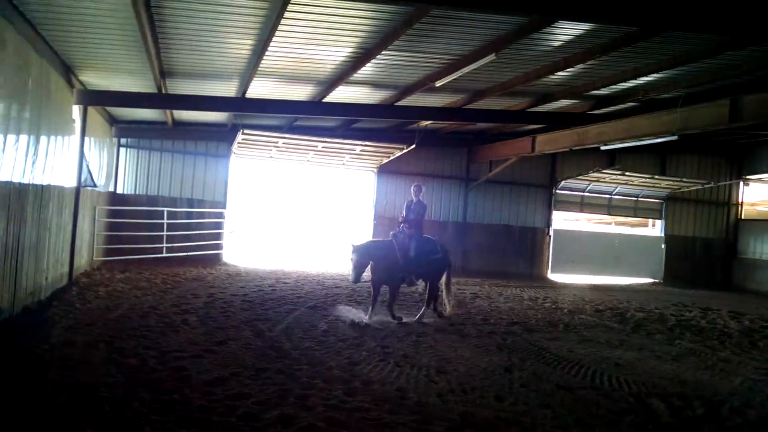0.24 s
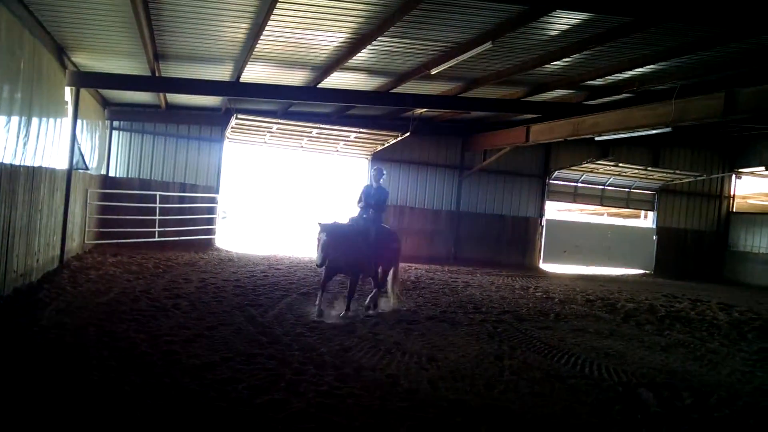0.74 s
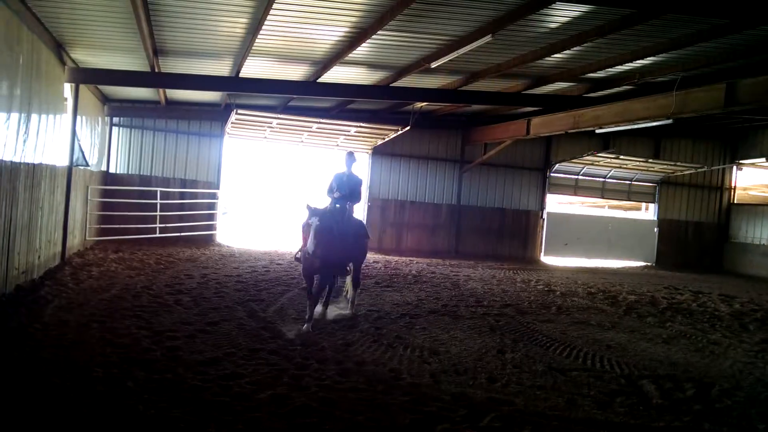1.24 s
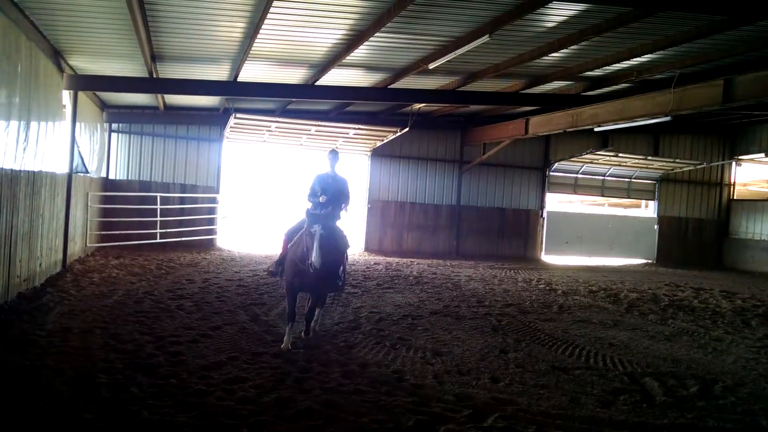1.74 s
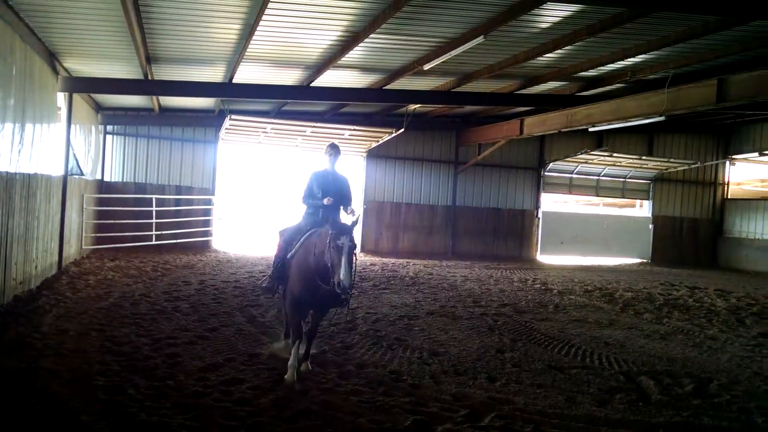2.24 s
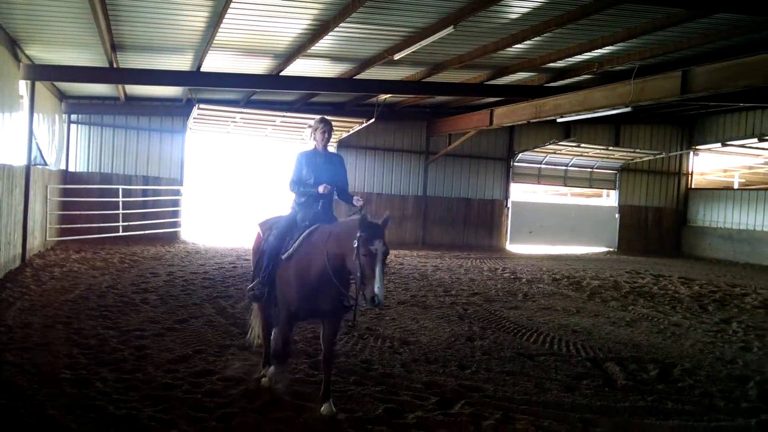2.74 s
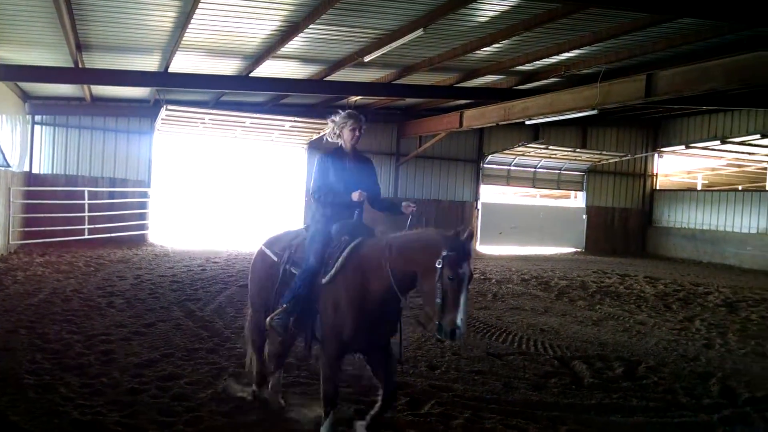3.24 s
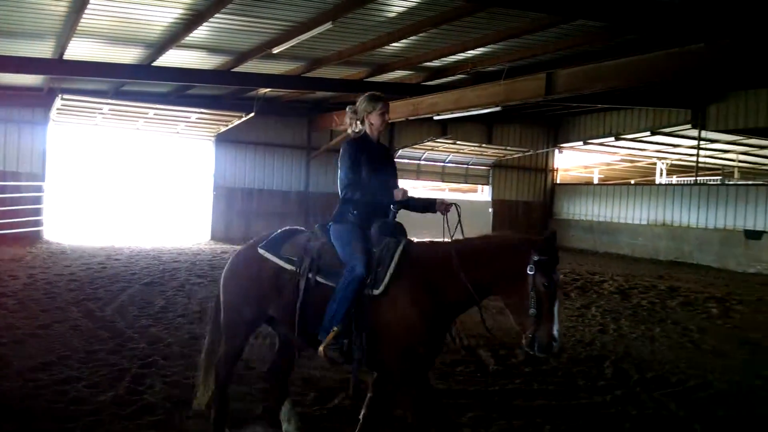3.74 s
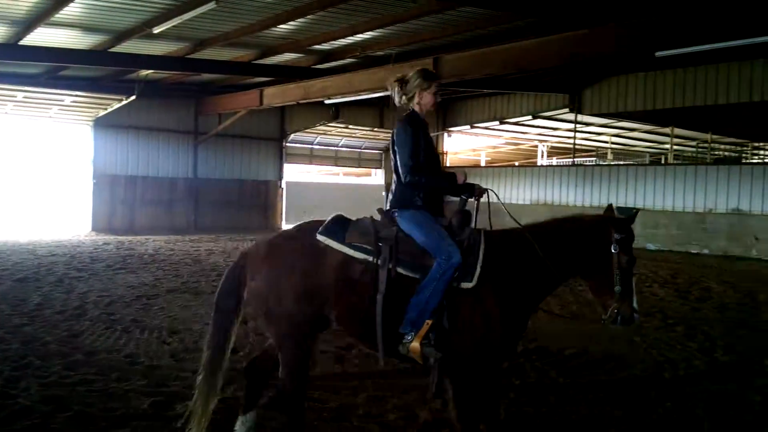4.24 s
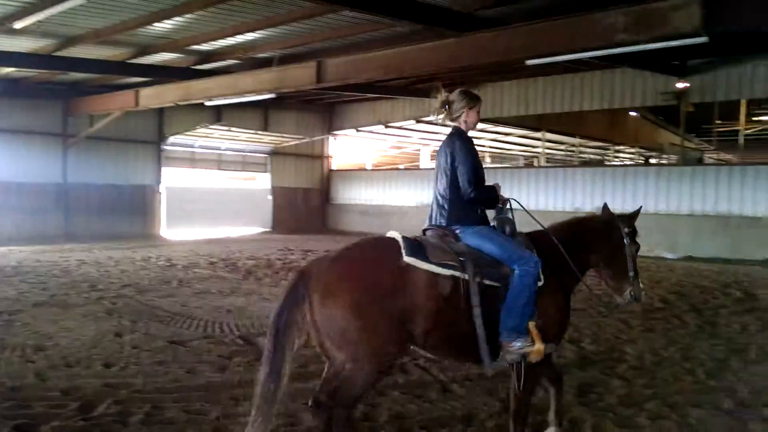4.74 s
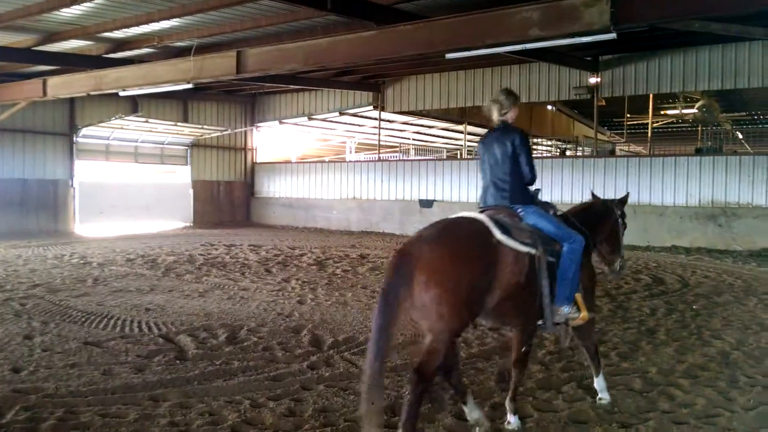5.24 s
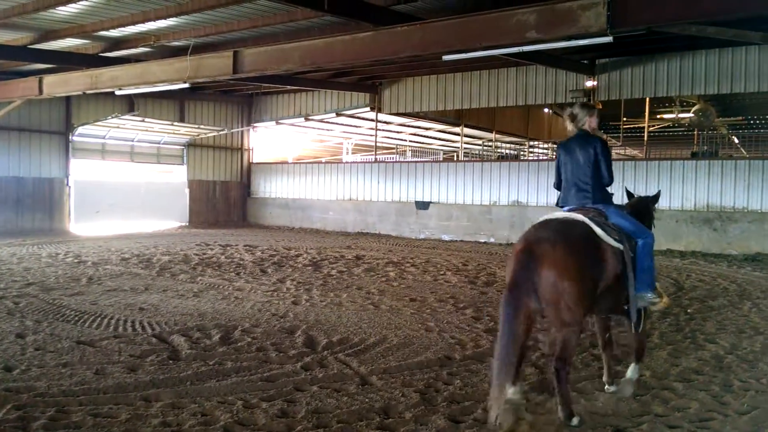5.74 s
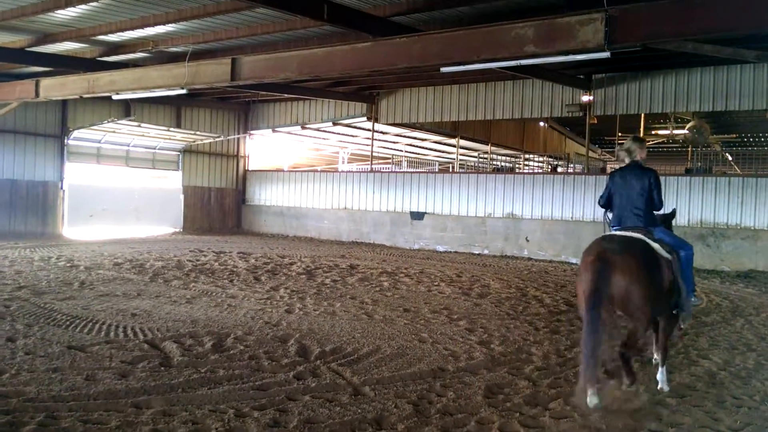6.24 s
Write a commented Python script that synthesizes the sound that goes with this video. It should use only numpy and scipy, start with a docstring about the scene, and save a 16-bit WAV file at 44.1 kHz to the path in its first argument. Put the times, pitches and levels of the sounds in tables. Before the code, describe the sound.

From the start a heavy vehicle drones outside, its low engine hum wavering over muffled rumble and road roar, with a very thin high whine on top. In the first half second the hand-held microphone is bumped, giving dull low booms. Bright steel ring chinks cluster from about 0.6 to 1 second, and sharp buckle clicks come near 1.3, beside a heavier thud at 1.4. The horse walks nearer at almost three soft steps a second, sand spraying, legs brushing and scuffing. It is closest around 3.5 seconds, where rings chink densely, tyre howl peaks, and low thuds follow at 3.7 and 4. Dry clicks crowd from 4 to 5, strong at 4.8, with sand crumbling near 5. Another hard click lands at 5.7. The engine and howl have sunk in pitch; a late drone rises toward the end at 6.5 as the steps recede in the short metallic room.

```python
"""A ridden horse walks past on soft sand in a sheet-metal indoor arena: struck steel modes make the rings chink,
short cracks with crowded partials click the buckles, enveloped noise makes the hooves thud, crumble and scuff.
Outside a heavy vehicle drones by: engine lines and tyre howl sink slowly in pitch over shaped road noise.
A thin whine holds on top. The hand-held camera is bumped; its two ports, each subtracted, delayed,
from the other, widen the stereo image."""
import sys
import numpy as np
from scipy import signal
from scipy.fft import rfft, irfft, next_fast_len
from scipy.io import wavfile
from scipy.ndimage import map_coordinates

SR = 44100
rng = np.random.default_rng(int(sys.argv[2]) if len(sys.argv) > 2 else 0)


def generate_wav(signal):
    """Clip the signal to [-1, 1] and save it as 16-bit WAV at the path in sys.argv[1]."""
    frames = np.transpose(np.atleast_2d(signal))
    scaled = np.clip(frames, -1, 1) * 32767
    pcm = np.round(scaled).astype(np.int16)
    wavfile.write(sys.argv[1], SR, pcm)


N = 285856
LEFT_RIGHT = np.array([[1], [-1]])  # opposite signs for the two ports

# Table levels are faders ahead of any trim in the function that plays them; spectra are relative.


def amp(db):
    """Decibels to gain."""
    return 10 ** (np.asarray(db) / 20)


def unit(x):
    """Scale to rms 1."""
    return x / np.sqrt(np.mean(x ** 2) + 1e-20)


def along(points, hz):
    """Read (f/Hz, value) points on a log frequency axis."""
    f, v = np.transpose(points)
    return np.interp(np.log(hz + 1), np.log(f + 1), v)


def curves(rows):
    """One automation curve, a value per sample, for each column after the time."""
    s, *cols = np.transpose(rows)
    return [np.interp(np.arange(N) / SR, s, c) for c in cols]


def wobble(rate):
    """A smooth random curve with rate knots a second."""
    return map_coordinates(rng.standard_normal(2048), [np.arange(N) * rate / SR], mode="wrap")


def filtered(x, response):
    """Filter x by a complex response of frequency."""
    size = x.shape[-1]
    m = next_fast_len(size + 8192)
    return irfft(rfft(x, m) * response(np.fft.rfftfreq(m, 1 / SR)), m)[..., :size]


def coloured(x, spectrum):
    """Shape x by a spectrum and scale to rms 1."""
    return unit(filtered(x, lambda hz: amp(along(spectrum, hz))))


def add(track, s, sound):
    """Mix a sound into a track at s seconds."""
    start = max(0, round(s * SR))
    part = track[..., start:start + sound.shape[-1]]
    part += sound[..., :part.shape[-1]]


def blows(rows, rise, t60):
    """Envelope of soft blows that swell and die; rise and t60 in seconds."""
    track, t = np.zeros(N), np.arange(SR // 2) / SR
    shape = (1 - np.exp(-t / rise)) * amp(-60 * t / t60)
    for s, db in rows:
        add(track, s - rise, amp(db) * shape / shape.max())
    return track


# Likeness of the noise at the two ports: f/Hz, correlation [-1 to 1]
PORT_LIKENESS = [(40, 0), (150, 0.38), (500, 0.59), (1200, 0.42), (2500, 0), (8000, 0.7)]


def rush(spectrum, lead=0):
    """Diffuse stereo noise, partly alike at the ports; the left one leads by an angle in radians."""
    def mid_side(hz):
        turn = np.arccos(np.clip(along(PORT_LIKENESS, hz), -1, 1)) / 2
        return amp(along(spectrum, hz)) * np.array([np.cos(turn), np.sin(turn)])
    mid, side = filtered(rng.standard_normal((2, N)), mid_side)
    ports = np.array([mid + side, mid - side])
    return unit(filtered(ports, lambda hz: np.exp(.5j * lead * LEFT_RIGHT)))


def tone(hz, lead, waver_db):
    """A wavering sine line of rms 1; room modes put the ports out of step (lead in radians)."""
    phase = 2 * np.pi * (np.cumsum(hz) / SR + rng.random())
    skew = .5 * (lead + 0.45 * wobble(2.25)) * LEFT_RIGHT
    return unit(np.sin(phase + skew) * amp(waver_db * np.array([wobble(3.29), wobble(6)])))


# The engine slows: t/s, cycle rate f/Hz
ENGINE_CYCLE = [(0, 17.2), (1.5, 16.9), (2.7, 16.45), (4, 16.05), (5.2, 15.65), (6.48, 15.4)]
# Faders of engine orders 3, 5 (firing) and 8: t/s, level/dB
THIRD_ORDER = [(0, -48), (0.22, -55), (0.42, -39), (0.65, -36.5), (0.81, -50), (1.15, -42.5), (1.6, -42),
               (1.82, -55), (2.2, -43), (2.55, -54), (2.9, -41), (3.55, -45), (4.05, -51), (5.0, -46),
               (5.9, -42.5), (6.48, -52)]
FIRING_ORDER = [(0, -36.5), (0.3, -38), (0.7, -52), (0.92, -33.5), (1.45, -35), (1.9, -32.5), (2.25, -37),
                (3.05, -33.5), (3.54, -42), (3.87, -33.5), (4.03, -52), (4.25, -43.5), (4.6, -37),
                (4.98, -53), (5.4, -36.5), (5.9, -36), (6.1, -47.5), (6.48, -45)]
EIGHTH_ORDER = [(0, -42), (0.7, -35.5), (1.12, -31), (1.38, -40), (1.7, -30), (2.1, -39), (2.35, -34),
                (2.9, -39.5), (3.25, -39.5), (3.5, -37), (3.85, -32), (4.8, -43), (5.15, -35), (5.5, -50),
                (6.48, -50)]
# Weaker engine lines: order [multiple of the cycle rate], level/dB
WEAK_LINES = [(6, -60), (9, -40), (10, -62), (11, -45.5), (15.5, -55), (18.5, -46.5)]
# A second drone that comes up late: t/s, f/Hz, level/dB
LATE_DRONE = [(3.5, 135.2, -54), (5.3, 135.7, -45.5), (5.8, 140, -47), (6.2, 140.3, -38),
              (6.48, 142.5, -35.5)]


def engine():
    """Engine lines at multiples of the cycle rate, so they sink together as it slows, plus a late drone."""
    cycle_hz, = curves(ENGINE_CYCLE)
    third_db, = curves(THIRD_ORDER)
    firing_db, = curves(FIRING_ORDER)
    eighth_db, = curves(EIGHTH_ORDER)
    drone_hz, drone_db = curves(LATE_DRONE)
    lines = amp(third_db + 7.5) * tone(3 * cycle_hz, lead=1.75, waver_db=2.7)
    lines += amp(firing_db + 4.0) * tone(5 * cycle_hz, lead=1.39, waver_db=1.0)
    lines += amp(eighth_db + 1.5) * tone(8 * cycle_hz, lead=0.9, waver_db=3.15)
    lines += amp(drone_db) * tone(drone_hz, lead=0.8, waver_db=1.2)
    # the weak lines ride the firing order and sag by 2.5 dB a second
    load = unit(amp(firing_db)) * amp(-2.5 * np.arange(N) / SR)
    for order, db in WEAK_LINES:
        lines += load * amp(db) * tone(order * cycle_hz, lead=1.3, waver_db=3.0)
    return lines * amp([[-1.5], [0.7]])  # weaker at the left port


# Pitch of the upper howl tone: t/s, f/Hz
HOWL_PITCH = [(0, 588), (0.75, 580), (1.4, 573), (2.4, 558), (3.4, 545), (4.2, 539), (5, 533), (6.48, 528)]
# Faders of the upper and the lower howl tone: t/s, level/dB
UPPER_TONE = [(0.5, -58), (0.78, -41), (1.0, -52), (1.3, -44), (1.85, -54), (2.03, -41), (2.7, -53),
              (2.92, -41), (3.15, -59), (3.46, -35), (3.65, -47), (4.2, -40), (4.47, -56.5), (4.65, -42),
              (4.97, -43.5), (5.2, -76), (6.48, -70)]
LOWER_TONE = [(0, -85), (1.6, -52), (1.8, -42.5), (2.2, -59), (2.75, -43.5), (3.3, -46), (3.45, -40.5),
              (3.6, -46.5), (3.77, -33.5), (4.0, -42.5), (4.25, -48.5), (4.65, -56), (4.85, -42),
              (5.35, -55.5), (5.77, -45), (6.1, -61)]
LOWER_SHARE = .869  # pitch of the lower tone as a share of the upper
PITCH_WAVER, BAND_KNOTS_PER_S = 0.01, 110  # pitch scatter as a share; more knots widen the noise band


def howl(near_db):
    """Tread noise: two wavering tones that sink in pitch, over a band of noise between them."""
    upper_hz, = curves(HOWL_PITCH)
    tones = 0
    for share, rows in [(1, UPPER_TONE), (LOWER_SHARE, LOWER_TONE)]:
        level_db, = curves(rows)
        pitch_hz = share * upper_hz * (1 + PITCH_WAVER * wobble(14))
        flutter = unit(amp(3 * wobble(16)))
        tones = tones + amp(level_db) * tone(pitch_hz, lead=0.8, waver_db=1.5) * flutter
    centre_hz = np.sqrt(LOWER_SHARE) * upper_hz
    phase = 2 * np.pi * np.cumsum(centre_hz) / SR + .45 * LEFT_RIGHT
    noise = wobble(BAND_KNOTS_PER_S) + 1j * wobble(BAND_KNOTS_PER_S)
    band = unit(np.real(noise * np.exp(1j * phase)))
    return tones + amp(-52.5 + 0.81 * near_db) * band


# Spectra of roar, rumble and road hiss: f/Hz, level/dB
ROAR_COLOUR = [(150, 3), (280, -2), (390, -3), (560, 0.5), (720, 0.5), (1000, -5.5), (1400, -16),
               (2400, -46)]
RUMBLE_COLOUR = [(10, -37), (25, 0), (45, 2.5), (100, 0.5), (200, -1.5), (270, 4.5), (330, -1.5),
                 (400, -11.5), (700, -6), (2000, -111)]
ROAD_HISS_COLOUR = [(600, 0), (950, 2.5), (1250, 3), (1600, -1.5), (1950, -6), (2400, -9.5), (3500, -18),
                    (6000, -63)]
# Fader of the road hiss: t/s, level/dB
ROAD_HISS_LEVEL = [(0, -47.5), (1.4, -46.5), (2.0, -40), (2.35, -43), (2.95, -41), (4.1, -44),
                   (4.65, -41.5), (4.95, -38.5), (5.8, -41.5), (6.15, -39.5), (6.48, -43)]


def road_noise(near_db):
    """Roar, hiss and rumble as shaped noise; roar and rumble grow slightly with the passing."""
    hiss_db, = curves(ROAD_HISS_LEVEL)
    roar = amp(-38 + 0.21 * near_db + 1.14 * wobble(13)) * rush(ROAR_COLOUR, lead=0.42)
    hiss = amp(hiss_db - 1.0 + 0.99 * wobble(8)) * rush(ROAD_HISS_COLOUR, lead=0.27)
    rumble = amp(-37.5 + 0.12 * near_db + 2.16 * wobble(6.4)) * rush(RUMBLE_COLOUR, lead=0.4)
    return roar + hiss + rumble


# Loudness contour of the passing vehicle, used about its mean: t/s, level/dB
PASSING_LEVEL = [(0, -62), (1.3, -42.5), (2.0, -30), (2.25, -35), (2.8, -33), (3.28, -33.5), (3.46, -22),
                 (3.6, -29), (3.78, -26.5), (4.5, -34.5), (4.89, -31.5), (5.34, -52), (5.8, -51),
                 (6.48, -49)]


def vehicle():
    """Engine, tyre howl and road noise, muffled by the walls."""
    passing_db, = curves(PASSING_LEVEL)
    near_db = passing_db - passing_db.mean()
    return engine() + howl(near_db) + road_noise(near_db)


CLOSEST_S, CLOSEST_M, WALK_M_PER_S = 3.5, 1.86, 1.58


def horse_near_db():
    """Distance loss of the horse on a straight path past the camera: 0 dB at its closest."""
    along_m = WALK_M_PER_S * (np.arange(N) / SR - CLOSEST_S)
    return 20 * np.log10(CLOSEST_M / np.hypot(CLOSEST_M, along_m))


# Spectrum of sand grains: f/Hz, level/dB
SAND_COLOUR = [(800, -9.5), (2000, 7), (2800, -9.5), (4000, -0.5), (6000, 0), (8000, -1.5), (11000, 1),
               (13000, 0.5), (14700, 5.5), (15450, 6.5), (15900, -40)]


def grains(spread_db, size=40):
    """Clumps of sand grains, each about a millisecond long, of widely varying strength."""
    clumps = np.repeat(np.clip(rng.standard_normal(N // size + 1), -3, 3), size)[:N]
    return coloured(rng.standard_normal((2, N)) * amp(spread_db * clumps), SAND_COLOUR)


def sand_hiss(near_db):
    """A bed of sand grains that swells gently as the horse comes near."""
    return amp(-50.5 + 0.49 * near_db + 0.24 * wobble(9)) * grains(spread_db=2.5)


def grit(near_db):
    """Single grit and leather ticks, mostly tiny, a few standing out, rising as the horse comes near."""
    track, t = np.zeros(N), np.arange(SR // 200) / SR
    for when, size in rng.random(size=(420, 2)):
        strength = min(-np.log(1 - size), 3.4)
        tick = amp(4 * strength - 60 * t / 0.0012) * rng.standard_normal(len(t))
        add(track, when * N / SR, tick)
    return amp(-67.5 + 2.1 * near_db) * coloured(track, SAND_COLOUR)


# Spectrum of brushing legs and saddle: f/Hz, level/dB
SWISH_COLOUR = [(1200, 5.5), (2200, 7.5), (2650, 15.5), (3200, 4), (4200, -17.5), (7000, -37)]


def swish(near_db):
    """Legs and saddle brush as fluttering noise, louder as the horse comes near."""
    return amp(-49 + 1.38 * near_db + 2.5 * wobble(30)) * rush(SWISH_COLOUR)


def whine():
    """A thin steady sine at the top of the treble."""
    return amp(-70) * np.sin(2 * np.pi * 14000 * np.arange(N) / SR)


# The hand shifts on the camera: t/s, level/dB
HAND_BUMPS = [(0.025, -30), (0.24, -21.5), (0.425, -25), (0.465, -22)]


def handling():
    """Dull bumps rock the camera body, pushing one port in as the other pulls back."""
    colour = [(20, 0), (55, 13), (85, 15), (140, 9.0), (240, -9), (450, -39), (1500, -57)]  # f/Hz, level/dB
    boom = coloured(rng.standard_normal(N), colour)
    return blows(HAND_BUMPS, rise=0.0134, t60=0.19) * boom * np.array([[-amp(4)], [amp(-5.5)]])


# Steps, nearly three a second, each kicking up sand: t/s, level/dB
STEP_HITS = [(0.219, -65), (0.517, -67), (1.546, -62), (1.877, -57.5), (2.354, -65), (2.699, -60.5),
             (3.077, -64), (3.452, -57), (3.786, -59), (4.125, -59), (4.485, -58), (4.827, -60),
             (4.99, -69), (5.199, -64), (5.566, -58), (5.947, -65), (6.281, -59.5)]


def spray():
    """Each step sprays sand grains, and again more softly as the toe drags 66 ms later."""
    drags = [(s + 0.066, db - 9) for s, db in STEP_HITS]
    return amp(13.0) * blows(list(STEP_HITS) + drags, rise=0.0099, t60=0.24) * grains(spread_db=5)


# A hoof sinks in and crumbles the packed sand: t/s, level/dB
CRUMBLE_HITS = [(0.22, -50), (2.92, -40), (3.39, -44), (4.87, -42), (5.08, -39), (5.15, -43)]
# Spectrum of the crumbling: f/Hz, level/dB
CRUMBLE_COLOUR = [(400, -23), (700, 7), (1300, 1.5), (1900, -9.5), (2800, -36), (5000, -48)]


def crumble():
    """Packed sand gives way: rough, low-mid noise under soft blows."""
    rough = unit(amp(2.4 * wobble(300)) * rush(CRUMBLE_COLOUR, lead=0.27))
    return blows(CRUMBLE_HITS, rise=0.023, t60=0.33) * rough


# Clear chinks of the steel rings: t/s, level/dB, low mode level/dB, high mode level/dB
RING_CHINKS = [(0.25, -50, 3, -9), (0.578, -43, 0, -8), (0.648, -43, 3, -18), (0.755, -34, -28, -5),
               (0.81, -34, -22, -24), (0.827, -30, -26, -20), (0.881, -41, -24, -24),
               (0.931, -32.5, -13, -26), (1.012, -38, -5, -17), (1.621, -38, -21, -17), (1.671, -39, -7, 1),
               (1.742, -41, -15, -15), (1.894, -33, -16, -20), (2.067, -38, -19, -38),
               (2.236, -29, -29, -6), (2.400, -38, -5, -8), (2.724, -40, -5, -18), (2.749, -27, 1, -22),
               (2.755, -40, 10, -15), (2.79, -44, -13, -20), (2.946, -43, -14, -16), (2.99, -34, 0, -23),
               (3.107, -34.5, -5, -11), (3.436, -28, -13, -8), (3.508, -36, -5, -16),
               (3.531, -26, 0.5, -21), (3.603, -45, -4, -14), (3.691, -40, -10, -14),
               (3.792, -39, -14, -16), (3.838, -29.5, -12, -19), (3.874, -37, 0, -18),
               (3.945, -22, -26, -24), (4.19, -36, -25, -11), (4.268, -35, -22, -14), (4.644, -35, 1, -26),
               (5.102, -46, -7, -14), (5.334, -33, -32, -20), (5.392, -30.5, -27, -24), (5.642, -38, 9, -4),
               (6.1, -37, -5, -18)]
# Modes of the rings: f/Hz, level/dB, t60/s
RING_MODES = [(8530, -1.5, 0.032), (11650, -1.5, 0.03), (11720, 1, 0.009), (13670, -4.5, 0.028),
              (5860, -23, 0.032), (11060, -11, 0.015), (12100, -7, 0.018)]
# Spectrum of a hard contact's snap: f/Hz, level/dB
SNAP_COLOUR = [(2000, -24), (3500, -22.5), (4800, 5.5), (5700, 6.5), (7500, 6.5), (9500, 6.5), (11500, 4),
               (13500, -8), (16000, -20)]
CRACK_T60_S = .0034  # decay of a bare contact


def rings():
    """Steel rings strike, then rebound twice within milliseconds; leather damps the modes quickly."""
    track, t = np.zeros(N), np.arange(SR // 8) / SR
    hz, mode_db, t60 = np.transpose(RING_MODES)[:, :, None]
    strikes = list(RING_CHINKS)
    # four faint tinkles of the curb chain scatter around each clear chink, before or after it
    for s in np.repeat([row[0] for row in RING_CHINKS], 4):
        strikes.append((s + rng.normal(0, .06), rng.uniform(-55, -45), rng.uniform(-40, 2.9), -11))
    for s, db, low_db, high_db in strikes:
        blow_db = np.zeros_like(hz)
        blow_db[0], blow_db[3] = low_db - 5.0, high_db + 6.5
        tick = coloured(rng.standard_normal(len(t)), SNAP_COLOUR) * amp(-60 * t / CRACK_T60_S)
        add(track, s, amp(db - 13.5) * tick)
        rebounds = [(0, 0), (rng.uniform(0.002, .007), -5), (rng.uniform(0.0071, 0.024), -14)]
        for delay_s, drop_db in rebounds:
            pitch_hz = hz * (1 + rng.normal(0, 0.0084, hz.shape))  # detuned from blow to blow
            level_db = mode_db + blow_db + rng.normal(0, 1.6, hz.shape)
            modes = amp(level_db - 60 * t / t60) * np.sin(2 * np.pi * pitch_hz * t)
            onset = 1 - np.exp(-t / .001)
            add(track, s + delay_s, amp(db + drop_db - 3) * modes.sum(0) * onset)
    return track


# Decay of the arena: f/Hz, t60/s
HALL_DECAY = [(200, 0.19), (2000, 0.19), (6000, 0.21), (14000, 0.08)]


def hall(x):
    """The arena's tail: noise with a separate decay in each band, quickest at the top of the treble."""
    hz, t, z = signal.stft(rng.standard_normal((2, SR)), SR, nperseg=256)
    decay = amp(-60 * t / along(HALL_DECAY, hz)[:, None])
    tail = signal.istft(z * decay, SR, nperseg=256)[1]
    return signal.fftconvolve(x[None], tail / np.linalg.norm(tail[0]), axes=1)[:, :N]


# A ring swings free and sings on: t/s, level/dB
FREE_SWINGS = [(0.83, -48), (5.334, -51), (6.10, -55)]
# Modes of the free ring: f/Hz, level/dB, t60/s
FREE_MODES = [(10508, 0, .3), (11010, -7, .15)]


def free_ring():
    """A ring hangs clear of the leather and keeps ringing, chattering against its neighbour."""
    track, t = np.zeros(N), np.arange(SR // 2) / SR
    ring = sum(amp(db - 60 * t / t60) * np.sin(2 * np.pi * hz * t) for hz, db, t60 in FREE_MODES)
    for s, db in FREE_SWINGS:
        add(track, s, amp(db + 0.5) * ring)
    return track * (1 + .6 * wobble(260))


def crack(size, lead):
    """A contact of a millisecond or so, lead samples in, that holds every frequency equally."""
    t = (np.arange(size) - lead) / SR
    fade = (t >= 0) * amp(-60 * np.abs(t) / CRACK_T60_S)
    phase = np.angle(rfft(rng.standard_normal(size) * fade))
    return irfft(np.exp(1j * phase), size) * np.linalg.norm(fade)


def partials(size):
    """The crowded, uneven partials of a small steel part, spaced 129 Hz on average."""
    bins = size // 2 + 1
    sounding = rng.random(bins) < SR / size / 129
    return irfft(sounding * np.exp(2j * np.pi * rng.random(bins)), size)


# Buckles and bit knocking: t/s, snap level/dB, then relative to the snap:
# knock level/dB, body level/dB, chime level/dB, ping level/dB, ringing level/dB
BUCKLE_CLICKS = [(1.2744, -25.5, -3, -7, -16, -2, -21), (1.2811, -20.5, -8, -16, -7, 3, -24),
                 (1.4905, -43, -14, -12, -2, 0, -10), (1.547, -30.5, -12, -6, -8, 0, -9.5),
                 (1.8745, -42, -14, -8, -6, -4, -14), (1.906, -42, -16, -8, -6, -1, -18),
                 (2.117, -52, -14, -10, -9, 0, -20), (2.235, -29.5, -18, -18, -10, -4, -25),
                 (2.356, -37.5, 8.5, -9, -3, 9, -13), (2.363, -44, -10, -9, -4, 6, -20),
                 (2.596, -36.5, -14, -9, -8, -3, -11), (2.716, -35, 0, -9, -8, -7, -16),
                 (2.867, -35.5, -14, -4, 2, 2, -20), (3.443, -33, -16, -16, -8, 3, -18),
                 (3.4525, -28.5, -19, -12, -12, -6, -26), (3.484, -48, -16, -14, -8, 5, -18),
                 (3.5095, -37, -16, -12, -6, 1, -8), (3.5945, -39.5, -18, -5, -12, -3, -7),
                 (3.7883, -37, -12, -6, -6, 2, -18), (3.9458, -32, -14, -6, -12, -8, -23),
                 (3.9985, -39, -16, -10, -6, 4, -13), (4.086, -36.5, -14, -8, -2, 9, -18),
                 (4.118, -45, -14, -8, -4, 9, -21), (4.1413, -38.5, -12, -1, -2, 7, -8),
                 (4.1905, -40, -16, -8, -6, 2, -7), (4.251, -41, -16, -12, -4, 4, -12),
                 (4.2672, -32, -16, -14, 2, 4, -19), (4.304, -42, -16, -14, -8, 9, -10),
                 (4.485, -29.5, -13, -17, -12, -5, -16), (4.5525, -38, -16, -12, -6, 1, -16),
                 (4.565, -32.5, -13, -14, -8, 5, -12.5), (4.5878, -35, -20, -14, 1, 3, -20),
                 (4.645, -37, -16, -12, -3, 6, -12), (4.761, -40, -16, -8, -2, 2, -15),
                 (4.7895, -44, -16, -12, -6, 8, -22), (4.8169, -20, -3.5, -2.5, -19, -4, -27),
                 (4.853, -40, -14, -10, -8, 9, -11), (4.888, -33, -14, -14, -12, 3, -12.5),
                 (4.912, -43, -14, -13, -4, 8, -13), (4.9945, -51, -14, -19, -5, 18, -6),
                 (5.103, -35.5, -14, -14, 2, 0, -18), (5.205, -37, -14, -3, -9, 6, -15),
                 (5.3485, -43, -14, -14, 7, 6, -22), (5.523, -52, -14, -10, -6, 2, -22),
                 (5.528, -46, -14, -10, -6, 4, -22), (5.5665, -45, -14, -10, 1, 12, -11),
                 (5.6074, -36, -16, -7, -10, -6, -20), (5.7128, -20, -25, -20, 4, 2, -33),
                 (5.913, -41, -14, -12, 0, 9, -25), (5.921, -52, -14, -10, -5, 1, -24),
                 (5.949, -40.5, -17, -11, -10, -1, -5)]
# Spectra of a click's knock, body, chime and ping: f/Hz, level/dB
KNOCK_COLOUR = [(900, -17), (1400, 2), (1660, 8), (2000, -3), (2800, -17)]
BODY_COLOUR = [(1500, -24), (2200, -10), (2900, -1), (3700, 4), (4500, -0.5), (5500, 4.5), (8000, -40)]
CHIME_COLOUR = [(9500, -41), (10900, -8), (11350, -3), (11900, -11), (13000, -40)]
PING_COLOUR = [(11500, -40), (12700, 21), (13700, 15), (14900, 20), (16000, 3), (16800, -8)]


def buckles():
    """Hard dry contacts: a very short crack, weighted over five registers, as the steel rings briefly."""
    track, size, lead = np.zeros(N), 4096, 128
    t, hz = (np.arange(size) - lead) / SR, np.fft.rfftfreq(size, 1 / SR)
    colours = (SNAP_COLOUR, KNOCK_COLOUR, BODY_COLOUR, CHIME_COLOUR, PING_COLOUR)
    registers = np.array([unit(amp(along(colour, hz))) for colour in colours])
    for s, db, knock_db, body_db, chime_db, ping_db, ring_db in BUCKLE_CLICKS:
        weights = amp([[0], [knock_db], [body_db], [chime_db], [ping_db]])
        colour = np.linalg.norm(weights * registers, axis=0)
        decay = (t >= 0) * amp(ring_db + 1.0 - 60 * np.abs(t) / 0.1)  # t60 0.1 s
        ring = unit(partials(size)) * decay
        click = irfft(rfft(crack(size, lead) + ring) * colour, size)
        add(track, s - lead / SR, amp(db - 2.5) * click)
    return track


# The heavier hoof falls: t/s, thud level/dB, hollow note level/dB
HEAVY_STEPS = [(1.435, -25, -35.5), (3.719, -22.5, -40), (3.975, -21, -40), (5.171, -39, -33.5),
               (5.69, -34, -36.5)]
# Spectrum of a hoof on soft ground: f/Hz, level/dB
THUD_COLOUR = [(50, -0.5), (170, -44), (280, 20), (400, 14), (1200, -27)]


def thuds():
    """Heavy steps: a soft burst of low noise and a slower hollow note, weaker at the left port."""
    soft_rows = [(s, db) for s, db, _ in HEAVY_STEPS]
    hollow_rows = [(s, db) for s, _, db in HEAVY_STEPS]
    soft = amp(-13.5) * blows(soft_rows, rise=0.026, t60=0.36) * rush(THUD_COLOUR, lead=0.55)
    note = tone(np.full(N, 242.5), lead=1.0, waver_db=1.0)
    hollow = blows(hollow_rows, rise=0.068, t60=0.84) * note
    return soft + hollow * amp([[-6], [0]])


# A hoof or a leg scuffs: t/s, level/dB
SCUFF_HITS = [(2.11, -48), (2.34, -47), (2.71, -45), (2.99, -45), (3.06, -43.5), (3.43, -56), (3.62, -44),
              (4.88, -54)]


def scuffs():
    """A hoof or leg scrapes: roughened swish noise under soft blows."""
    rough = unit(amp(5 * wobble(700)) * rush(SWISH_COLOUR))
    return blows(SCUFF_HITS, rise=0.02, t60=0.22) * rough


def hooves():
    """Sand, grit and brushing follow the horse's distance; the single hoof sounds keep their own levels."""
    near_db = horse_near_db()
    bed = sand_hiss(near_db) + grit(near_db) + swish(near_db)
    return bed + spray() + crumble() + thuds() + scuffs()


def scene():
    """Tack and hooves in the arena, over the drone from outside."""
    tack = rings() + free_ring() + buckles()
    lag_s = 1.3e-5  # the tack reaches the left port later
    direct = filtered(tack, lambda hz: np.exp(-1j * np.pi * hz * lag_s * LEFT_RIGHT))
    return direct + amp(-3.5) * hall(tack) + hooves() + vehicle() + handling() + whine()


# Response of the left port against the right one: f/Hz, level/dB
LEFT_SHADE = [(60, -4.5), (140, -4), (250, -1), (450, 2), (1200, -1), (4000, -2), (7000, -5), (10000, -8),
              (15000, -9)]
# Share of each port subtracted from the other: f/Hz, share [0-1]
CROSS_SHARE = [(100, 0.022), (600, 0.24), (1300, 0.28), (2500, 0.57), (4000, 0.85), (8000, 0.39),
               (14000, 0.81)]
PORT_DELAY_S, TOP_HZ = .000392, 16050


def record(dry):
    """The left port is shaded in the treble; each port is subtracted, delayed, from the other; then a band limit."""
    def cross_response(hz):
        return np.clip(along(CROSS_SHARE, hz), 0, 1) * np.exp(-2j * np.pi * hz * PORT_DELAY_S)
    left = filtered(dry[0], lambda hz: amp(along(LEFT_SHADE, hz)))
    ports = np.array([left, dry[1]])
    wide = ports - filtered(ports[::-1], cross_response)
    return filtered(wide, lambda hz: 1 / np.sqrt(1 + (hz / TOP_HZ) ** 140))


dry = scene()
out = record(dry)
generate_wav(out)
```